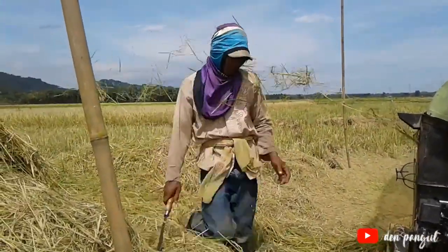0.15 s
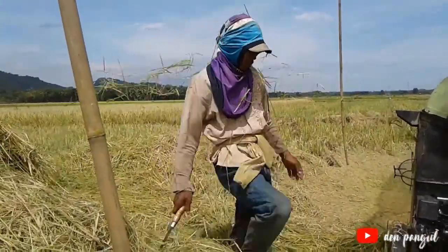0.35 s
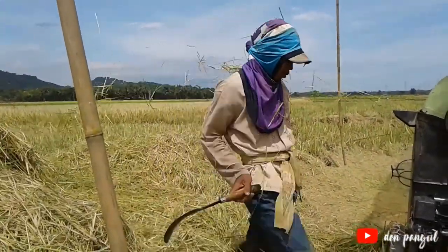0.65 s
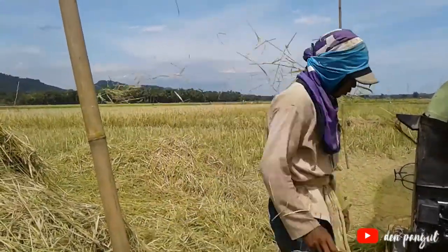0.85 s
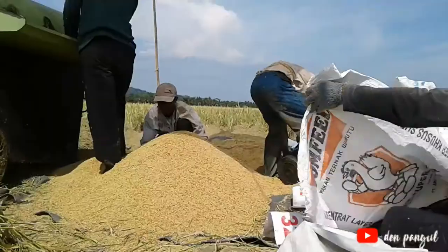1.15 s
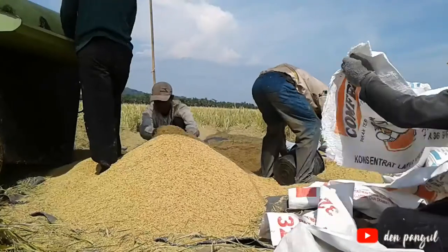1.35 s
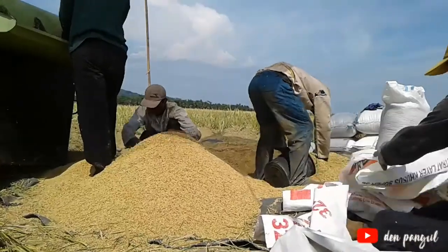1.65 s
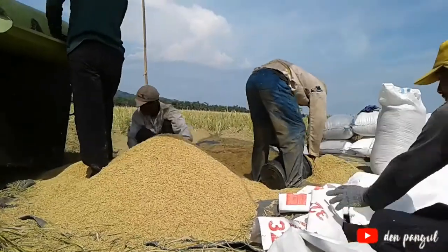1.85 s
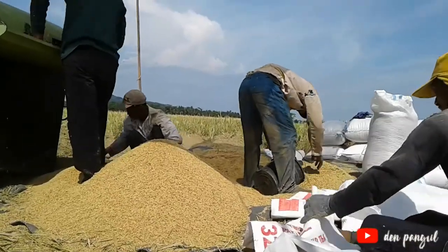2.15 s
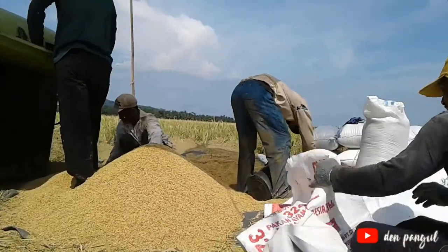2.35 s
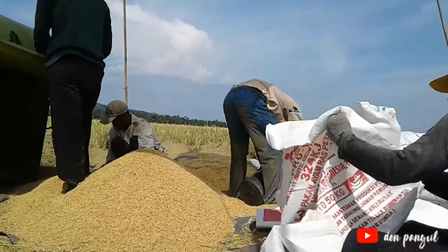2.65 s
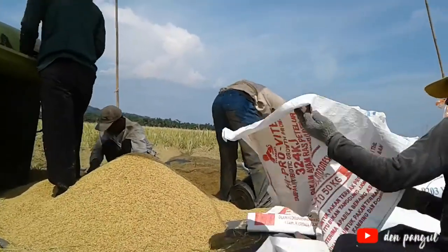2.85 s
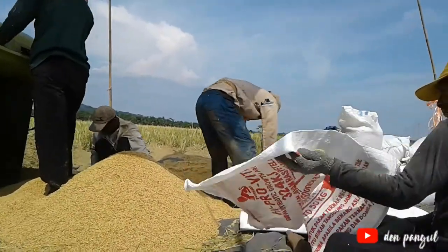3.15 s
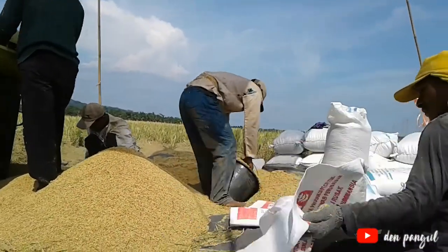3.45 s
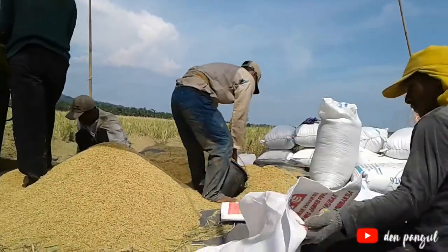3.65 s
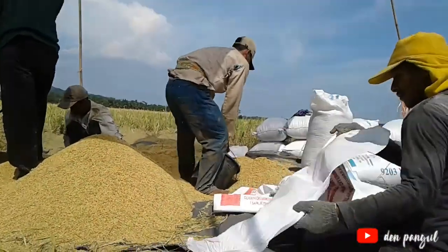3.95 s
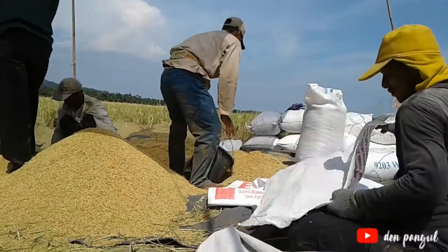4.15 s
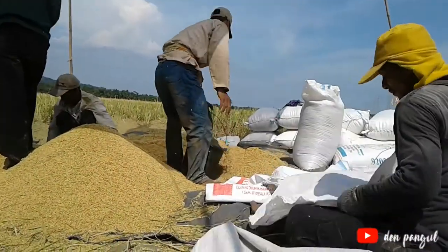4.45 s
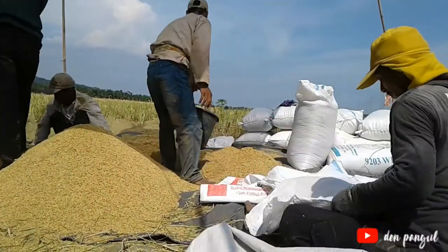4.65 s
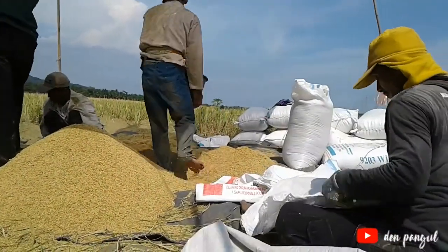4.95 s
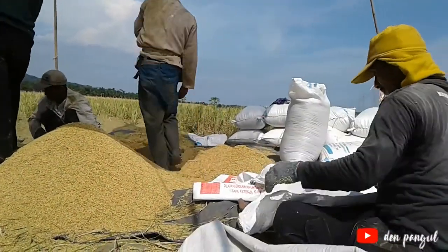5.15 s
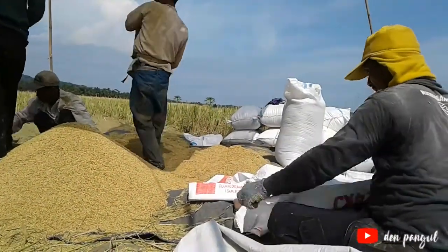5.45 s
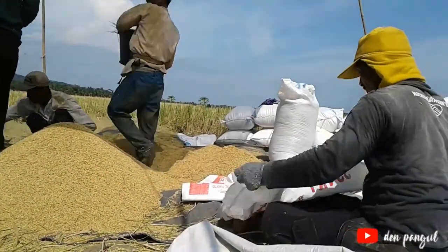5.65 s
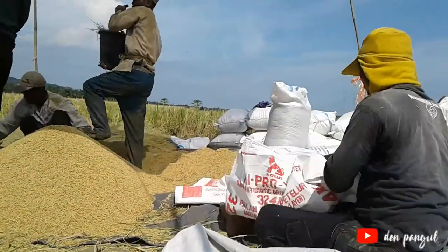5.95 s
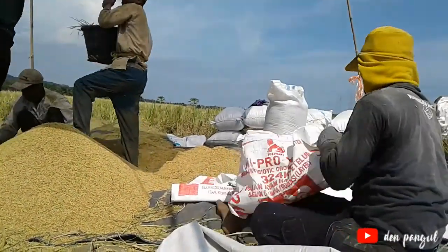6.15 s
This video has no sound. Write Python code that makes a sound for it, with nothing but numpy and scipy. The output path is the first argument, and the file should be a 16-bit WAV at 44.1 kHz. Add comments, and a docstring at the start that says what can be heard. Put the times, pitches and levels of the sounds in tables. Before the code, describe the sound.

A one-cylinder engine drives a threshing machine in a field. Close to the straw outlet, its rapid exhaust beat mixes with rushing straw, light steel ticks and the knocks of a loose panel. After about a second the sound cuts to silence. The machine fades back in as heard beside the grain heap: a low hum, a churning metal drum and hissing straw and grain, swelling slightly now and then.

```python
"""A one-cylinder engine drives a rice thresher in a field, heard from two places with a silence between.
At the straw outlet, periodic firing gives a harmonic exhaust beat; impacts excite the modes of steel
(ticks) and of a loose panel (knocks), and countless small collisions add up to the rush of straw.
Beside the grain heap the machine's low hum fades in, the drum churns in its resonant sheet-metal
housing and grain hisses; straw and grain swell as each sheaf goes through."""
import sys
import numpy as np
from scipy import signal
from scipy.fft import rfft, irfft, next_fast_len
from scipy.io import wavfile
from scipy.ndimage import map_coordinates

SR = 44100
rng = np.random.default_rng(int(sys.argv[2]) if len(sys.argv) > 2 else 0)


def file_out(sig):
    """Save sig as 16-bit WAV at sys.argv[1]."""
    # one column per channel
    cols = np.atleast_2d(sig).T
    # limit, then scale
    lim = np.clip(cols, -1, 1)
    pcm = np.round(lim * 32767).astype(np.int16)
    wavfile.write(sys.argv[1], SR, pcm)


N = 277830
OUTLET_END_S, HEAP_START_S, HEAP_FULL_S = 1.043, 1.38, 1.68
OUTLET_FIRING_HZ, DRUM_TURN_HZ = 16.75, 12

# Partials of the exhaust at the outlet: firing_multiple, relative_db
EXHAUST_ORDERS = [(5, -35.5), (6, -32.5), (7, -31.5), (8, -27.5), (9, -40), (10, -35), (11, -39.5),
                  (12, -38.5), (13, -45), (14, -46), (15, -42.5), (16, -31.5), (17, -35.5), (18, -42.5),
                  (19, -43.5), (20, -40.5), (21, -43.5), (22, -33), (23, -30.5), (24, -41), (25, -43.5),
                  (26, -41.5), (27, -39.5)]
# Partials of the machine's low hum at the heap, half orders included: pulse_multiple, relative_db
HUM_ORDERS = [(3, -55), (4, -50), (4.5, -52), (5, -48), (5.5, -41), (6, -36), (6.5, -35.5), (7, -32),
              (7.5, -30), (8, -29.5), (9, -36.5), (9.5, -34.5), (10, -24), (10.5, -30), (11, -34),
              (11.5, -36), (12, -28), (13.5, -42), (14, -39), (17.5, -39), (18, -41), (20, -41)]
# Spectra of exhaust rumble, drum housing, straw and grain at each place: frequency_hz, relative_db
OUTLET_RUMBLE = [(25, -33.5), (48, -29), (70, -11), (125, -8), (172, -6.5), (240, -3.5), (305, -3.5),
                 (340, -3.5), (382, -0.5), (450, -7.5), (540, -14), (700, -41.5), (1190, -120)]
OUTLET_DRUM = [(310, -31.5), (520, -6), (616, -4.5), (694, -3.5), (755, -5.5), (927, 0), (1070, -1.5),
               (1160, -0.5), (1360, -8.5), (1520, -5.5), (2030, -7), (2330, -3), (2800, -11), (3640, -47.5),
               (6160, -120)]
OUTLET_STRAW = [(1650, -31), (2800, -6.5), (3130, 0.5), (3640, -6.5), (4290, -1.5), (4650, -7.5),
                (5200, -2.5), (5710, -12.5), (6380, -7), (7470, -10.5), (8050, -6.5), (8950, -3.5),
                (11300, -22.5), (14700, -53.5), (22000, -120)]
OUTLET_GRAIN = [(6650, -41), (11300, -17), (13500, -1), (15100, 1.5), (15700, -3)]
HEAP_RUMBLE = [(22, -37), (54, -24), (76, -13), (93, -9), (115, -0.5), (127, -4), (152, 0), (176, -0.5),
               (200, -8), (225, -6.5), (242, -12), (262, -3), (280, -11), (300, -6.5), (340, -16),
               (430, -14), (540, -27), (900, -86)]
HEAP_DRUM_EARLY = [(310, -29), (530, -10), (660, 3), (850, -2), (965, 1.5), (1100, -10), (1330, 5.5),
                   (1400, 1), (1680, 1.5), (1900, -5.5), (2110, 4.5), (2230, 3.5), (2450, -10.5),
                   (2850, -9), (3640, -36)]
HEAP_DRUM_LATE = [(310, -29), (530, -9.5), (660, 0.5), (830, -1.5), (965, 2.5), (1130, -7), (1250, -8.5),
                  (1330, 2), (1400, -2), (1680, 2.5), (1830, 2), (1985, -7.5), (2220, 4), (2520, -7),
                  (2850, -16.5), (3640, -51)]
HEAP_STRAW = [(1650, -15), (2800, -2.5), (3380, 1), (3860, -4), (4570, 1.5), (6600, -6.5), (8540, -2.5),
              (9370, -5), (11300, -21), (14700, -51), (22000, -120)]
HEAP_GRAIN = [(6650, -46), (11300, -15.5), (12300, -8), (13400, -5), (14700, 4.5), (15700, -5)]
# Modes of the ticking steel and of the loose panel: pitch_hz, relative_db, t60_s
STEEL_MODES = [(3090, -6.5, .015), (4400, -8, 0.013), (5300, -10, 0.014), (6500, -10, .008), (8330, 0, .01),
               (8960, -1.5, .012), (9400, -9.5, .01), (13500, -9, .005)]
PANEL_MODES = [(940, -18, 0.027), (1173, -3.5, 0.056), (1200, -8, .035), (1506, 1, 0.033), (1620, -7, .03),
               (2260, -3.5, .03), (2660, -11, 0.038)]
# Knocks of the panel: start_s, peak_db, nearest_tick_change_db
KNOCKS = [(0.358, -12, -2), (0.396, -9, 2), (0.6374, -3.5, 8), (0.6985, -7, -4), (0.821, -7.5, 7.5),
          (0.8806, -3, 2), (0.942, -4.3, 6), (1.0083, -8, 1.5)]
# Pulse rate of the machine's low hum at the heap: time_s, pulse_hz
HUM_RATE = [(1.4, 14.85), (2.2, 14.95), (3.2, 14.8), (3.9, 14.85), (4.45, 14.7), (5.0, 14.84), (5.7, 14.85),
            (6.3, 14.7)]
# Bass contour at the heap; hum and rumble follow a share of its swing: time_s, relative_db
THROB = [(1.7, -17.5), (2.11, -16.5), (3.4, -18), (3.44, -24), (3.51, -16.5), (5.38, -16), (5.8, -14),
         (6.16, -18), (6.3, -16)]
# Narrow bands of hiss: centre_hz, half_width_hz, level_db, held_until_s, fall_db_per_s
SINGING_BANDS = [(8460, 370, -35.5, 2.4, 14), (15250, 300, -37, 3.45, 13)]
# Sheaves passing through: peak_s, straw_and_grain_change_db, drum_change_db
SHEAVES = [(1.83, 1.5, .4), (2.45, 1.5, -0.5), (3.37, 0.5, 0.5), (4.15, 1.3, .4), (4.68, 3, .8),
           (5.17, 0.4, 1.4), (5.47, 1.5, 0.7)]
# Swells in the low part of the churning: peak_s, level_db
CHURN_SWELLS = [(2.0, -31), (3.47, -29)]
# Spectrum of those swells: frequency_hz, relative_db
CHURN_BAND = [(230, -40), (380, 0), (600, -1), (780, 1), (1100, -40)]


def amp(db):
    """Amplitude grows tenfold for every 20 dB."""
    return 10 ** (np.asarray(db) / 20)


def unit(x):
    """Normalisation to rms 1."""
    return x / np.sqrt(np.mean(x ** 2) + 1e-20)


def curve(points):
    """Linear interpolation of (time_s, value) points at every sample."""
    return np.interp(np.arange(N) / SR, *np.transpose(points))


def wobble(rate_hz):
    """Smooth random fluctuation: a spline through Gaussian knots."""
    knots = rng.standard_normal(int(N * rate_hz / SR) + 4)
    return map_coordinates(knots, [np.arange(N) * rate_hz / SR])


def filtered(x, response):
    """Linear filtering multiplies the spectrum by a frequency response."""
    size = next_fast_len(N + SR // 2)
    return irfft(rfft(x, size) * response(np.fft.rfftfreq(size, 1 / SR)), size)[:N]


def coloured(x, spectrum):
    """Source and filter: a spectral envelope shapes the excitation x, returned at rms 1."""
    hz, db = np.transpose(spectrum)
    return unit(filtered(x, lambda f: amp(np.interp(np.log(f + 1), np.log(hz + 1), db))))


def surge(cycles, depth_db):
    """Amplitude modulation: a gain that swells once a cycle."""
    return unit(amp(depth_db * np.cos(2 * np.pi * cycles)))


def impacts(rate_hz, spread_db):
    """Shot noise: tiny independent impacts of scattered size."""
    hits = rng.random(N) < rate_hz / SR
    return unit(hits * rng.choice([-1, 1], N) * amp(spread_db * rng.standard_normal(N)))


def drone(cycles, orders):
    """Fourier series: the exhaust beat or the low hum is a sum of partials, each wavering in phase."""
    out = np.zeros(N)
    for order, db in orders:
        phase = 2 * np.pi * (order * cycles + rng.random()) + 0.15 * wobble(4.9)
        out += np.sqrt(2) * amp(db) * np.sin(phase)
    return out


def rumble(cycles, spectrum, puff_db):
    """Turbulence in the exhaust gas makes noise, coloured by the booming of the machine's frame."""
    return coloured(rng.standard_normal(N) * surge(cycles, puff_db), spectrum)


def drum(spectrum, rate_hz, turn_db, bar_db, bars=4):
    """Impact excitation: rows of beater teeth fling stalks and grain against the resonant housing."""
    turns = DRUM_TURN_HZ * np.arange(N) / SR + 0.08 * wobble(2.2)
    beating = surge(turns, turn_db) * surge(2 * turns, turn_db) * surge(bars * turns, bar_db)
    return coloured(impacts(rate_hz, spread_db=2) * beating, spectrum)


def shower(cycles, spectrum, rate_hz, spread_db, shake_db, clump_db):
    """Modulated shot noise: straw or grain strikes metal in clumps, shaken at the machine's pace."""
    flow = surge(cycles, shake_db) * amp(clump_db * wobble(70))
    return coloured(impacts(rate_hz, spread_db) * flow, spectrum)


def strikes(events, modes, contact_s):
    """Modal ringing: each blow's chattering force is convolved with damped modes of random strength."""
    out, t = np.zeros(N + SR), np.arange(SR // 10) / SR
    for start_s, peak_db in events:
        ring = sum(amp(db + rng.normal(0, 2.7) - 60 * t / t60_s) * np.sin(2 * np.pi * pitch_hz * t)
                   for pitch_hz, db, t60_s in modes)
        chatter = rng.standard_normal(len(t)) * t * np.exp(-(t / contact_s) ** 2)
        blow = signal.fftconvolve(chatter, ring)[:len(t)]
        out[round(start_s * SR):][:len(t)] += amp(peak_db) * blow / np.abs(blow).max()
    return out[:N]


def ticks(first_s=0.0487, gap_s=0.0595, gap_growth_s=0.000136):
    """Brief contact rings high modes of steel about once a cycle, mostly harder next to a knock."""
    cycle = np.arange(int(OUTLET_END_S / gap_s))
    start_s = first_s + gap_s * cycle + gap_growth_s * cycle ** 2 / 2
    peak_db = -15.5 + 1.5 * rng.standard_normal(len(cycle))
    for knock_s, _, change_db in KNOCKS:
        peak_db += change_db * (np.abs(start_s - knock_s) < gap_s / 2)
    return strikes(zip(start_s, peak_db), STEEL_MODES, contact_s=0.0017)


def knocks():
    """Damped free vibration of a loose panel follows each blow."""
    return strikes([(start_s, db) for start_s, db, _ in KNOCKS], PANEL_MODES, contact_s=0.0045)


def at_outlet():
    """Superposition of the sources close to the engine and the straw outlet."""
    cycles = OUTLET_FIRING_HZ * np.arange(N) / SR
    engine = amp(2) * drone(cycles, EXHAUST_ORDERS)
    engine += amp(-16.5) * rumble(cycles, OUTLET_RUMBLE, puff_db=-0.5)
    churn = drum(OUTLET_DRUM, rate_hz=5000, turn_db=0, bar_db=0)
    straw = shower(cycles, OUTLET_STRAW, rate_hz=11000, spread_db=2, shake_db=1, clump_db=1.05)
    grain = shower(cycles, OUTLET_GRAIN, rate_hz=16000, spread_db=2, shake_db=0.5, clump_db=2)
    return engine + amp(-19.5) * churn + amp(-26) * straw + amp(-32) * grain + knocks() + ticks()


def heap_drum():
    """An equal-power crossfade shifts the colour of the churning at a steady level."""
    late_share = curve([(2.2, 0.015), (2.9, 0.99)])
    early, late = (drum(spectrum, rate_hz=4500, turn_db=0.45, bar_db=0.1)
                   for spectrum in (HEAP_DRUM_EARLY, HEAP_DRUM_LATE))
    return unit(np.sqrt(1 - late_share) * early + np.sqrt(late_share) * late)


def singing(centre_hz, half_width_hz, level_db, held_until_s, fall_db_per_s):
    """Narrow-band noise is heard as a pitched hiss; it holds, then decays exponentially."""
    fall_db = fall_db_per_s * np.maximum(np.arange(N) / SR - held_until_s, 0)
    band = filtered(rng.standard_normal(N), lambda f: 1 / (1 + ((f - centre_hz) / half_width_hz) ** 2))
    return amp(level_db - fall_db) * unit(band)


def sheaves(half_length_s=0.14):
    """Impact noise follows the flow: each sheaf briefly shifts the hiss and drum levels, in dB."""
    t = np.arange(N) / SR
    return sum(np.outer(changes_db, np.exp(-((t - peak_s) / half_length_s) ** 2))
               for peak_s, *changes_db in SHEAVES)


def churn_swells(half_length_s=0.12):
    """Band-limited shot noise under Gaussian envelopes gives short, hollow surges."""
    t = np.arange(N) / SR
    gain = sum(amp(db) * np.exp(-((t - peak_s) / half_length_s) ** 2) for peak_s, db in CHURN_SWELLS)
    return gain * coloured(impacts(rate_hz=3000, spread_db=1.5), CHURN_BAND)


def at_heap(throb_share=0.58):
    """Acoustic shadow: beside the grain heap the machine's body screens the engine's clatter."""
    cycles = np.cumsum(curve(HUM_RATE)) / SR
    throb_db = curve(THROB)
    bass = drone(cycles, HUM_ORDERS) + amp(-18.5) * rumble(cycles, HEAP_RUMBLE, puff_db=0)
    bass *= amp(throb_share * (throb_db - throb_db.mean()))
    churn = heap_drum()
    straw = shower(cycles, HEAP_STRAW, rate_hz=9000, spread_db=1.5, shake_db=0.08, clump_db=0.93)
    grain = shower(cycles, HEAP_GRAIN, rate_hz=9000, spread_db=3, shake_db=0.5, clump_db=1.2)
    # Each level is a base in dB, a slow drift in dB per second and the passing sheaves.
    elapsed_s = np.arange(N) / SR - HEAP_FULL_S
    feed_db, load_db = sheaves()
    churn *= amp(-23 + 0.05 * elapsed_s + load_db)
    straw *= amp(-30 + 0.49 * elapsed_s + feed_db)
    grain *= amp(-31.5 - 0.9 * elapsed_s + feed_db)
    return bass + churn + churn_swells() + straw + grain + sum(singing(*band) for band in SINGING_BANDS)


def scene(cut_s=0.006):
    """Linear gain ramps cut the outlet to silence, then fade in the heap."""
    t = np.arange(N) / SR
    cut = np.clip((OUTLET_END_S - t) / cut_s + 0.5, 0, 1)
    fade = np.clip((t - HEAP_START_S) / (HEAP_FULL_S - HEAP_START_S), 0, 1)
    return (at_outlet() * cut + at_heap() * fade)[None]


def record(dry):
    """Band limiting: a steep low-pass filter removes the highest treble."""
    cutoff_hz, edge_hz = 15800, 100
    return np.array([filtered(dry[0], lambda hz: np.clip((cutoff_hz - hz) / edge_hz + 0.5, 0, 1))])


dry = scene()
out = record(dry)
file_out(out)
```